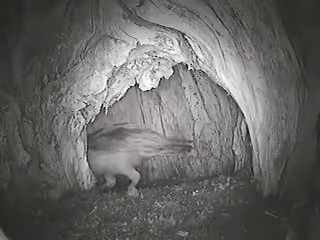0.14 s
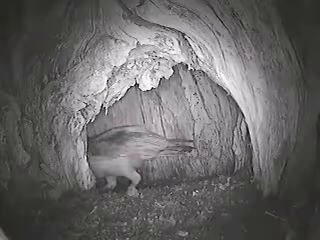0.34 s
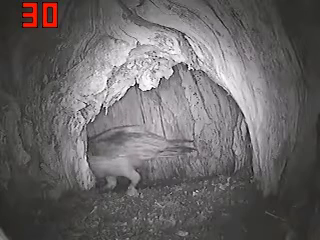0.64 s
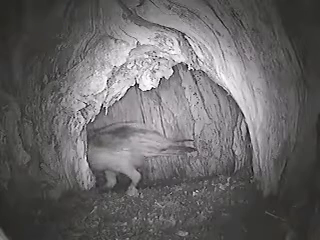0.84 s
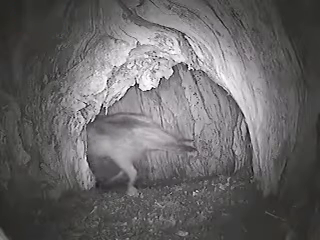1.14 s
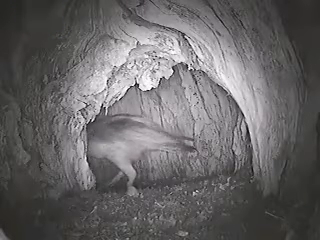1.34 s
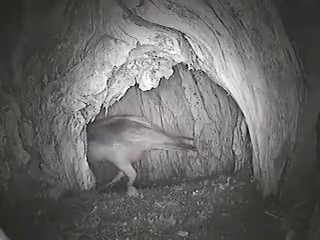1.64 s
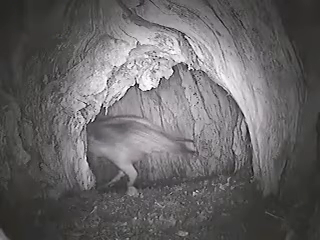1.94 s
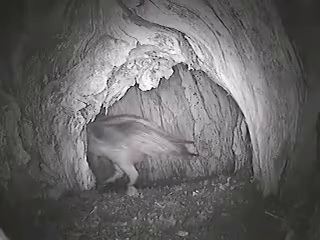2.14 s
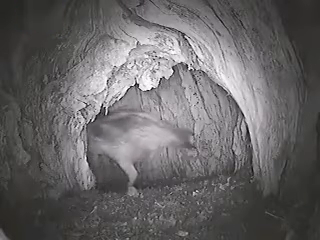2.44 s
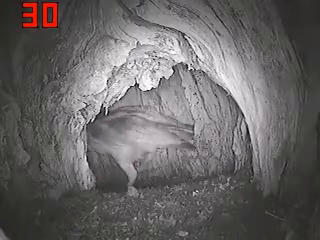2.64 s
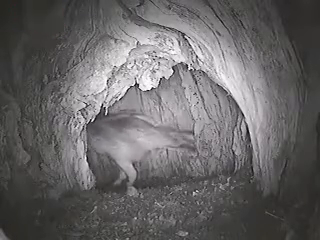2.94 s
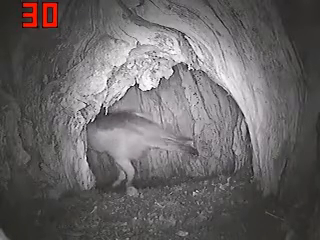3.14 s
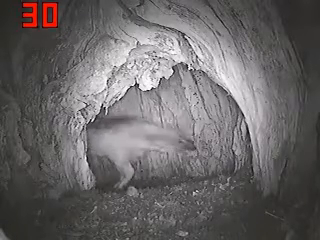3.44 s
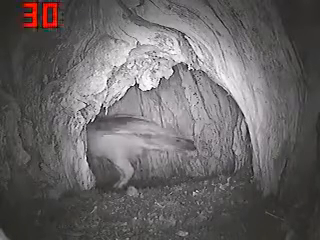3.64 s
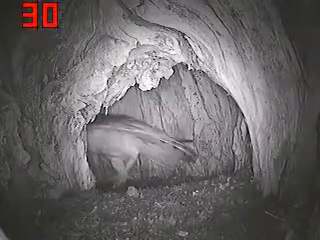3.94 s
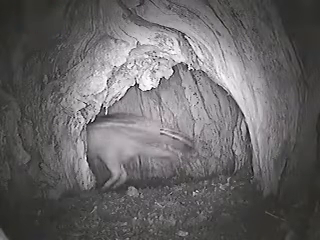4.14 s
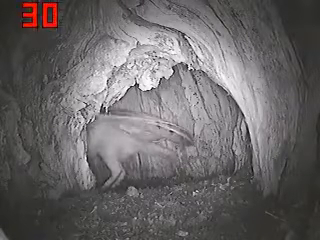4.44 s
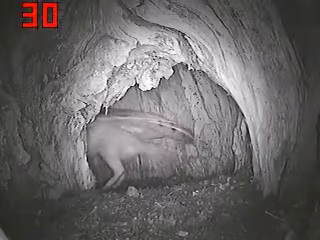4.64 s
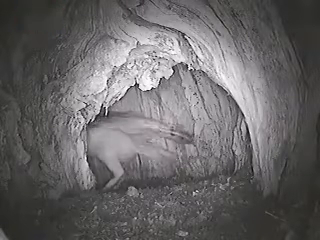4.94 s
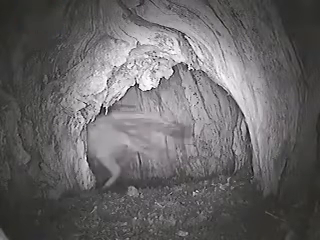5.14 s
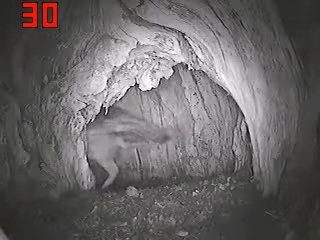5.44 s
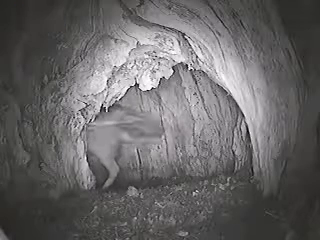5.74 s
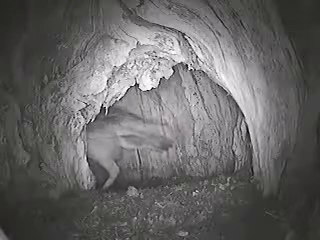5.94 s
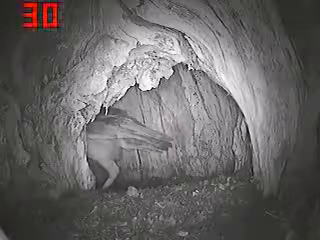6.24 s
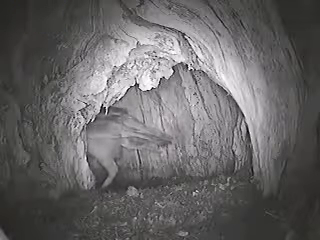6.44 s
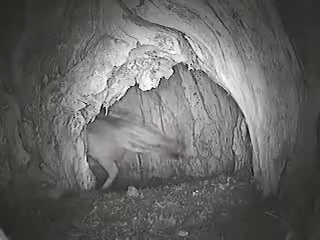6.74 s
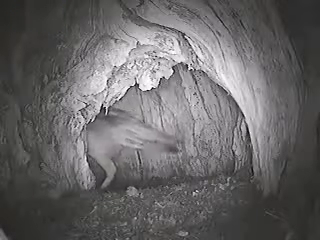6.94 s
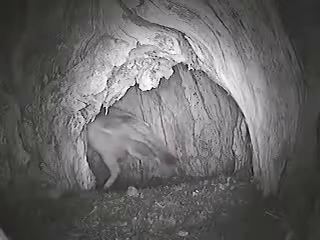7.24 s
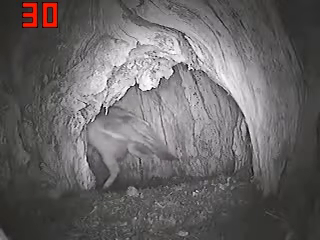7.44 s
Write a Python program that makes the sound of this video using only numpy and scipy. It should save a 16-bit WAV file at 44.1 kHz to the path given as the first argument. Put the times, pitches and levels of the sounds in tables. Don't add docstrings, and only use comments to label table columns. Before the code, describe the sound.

Two young barn owls beg for food in a hollow tree at night. The nearer one gives loud, harsh, half-second hisses that tighten as they swell and stop crisply. A second, fainter owl further back hisses at a steady pace of about once a second, at first overlapping, then drifting into the gaps. Wood adds a short bright ring. Faint air hiss and hum lie beneath, through a cheap, compressed nest microphone.

```python
import sys
import numpy as np
from scipy import signal
from scipy.fft import rfft, irfft
from scipy.io import wavfile
from scipy.ndimage import uniform_filter1d

SR = 44100
rng = np.random.default_rng(int(sys.argv[2]) if len(sys.argv) > 2 else 0)


def volts(x):
    e = np.asarray(x, float) / 20
    return 10 ** e


def log_audio(samples):
    frames = np.atleast_2d(samples).T
    limited = np.clip(frames, -1, 1)
    pcm = np.round(limited * 32767).astype(np.int16)
    wavfile.write(sys.argv[1], SR, pcm)


N = 334278


def evened(x):
    return x / np.sqrt(np.mean(x ** 2) + 1e-20)


def coloured(points, size):
    point_hz, point_db = np.transpose(points)
    hz = np.fft.rfftfreq(size, 1 / SR)
    gain_db = np.interp(np.log(hz + 1), np.log(point_hz), point_db)
    return irfft(rfft(rng.standard_normal(size)) * volts(gain_db), size)


def resonate(x, hz, width):
    turn = np.exp(2j * np.pi * np.cumsum(hz) / SR)
    r = np.exp(-np.pi * width / SR)
    once = signal.lfilter([1 - r], [1, -r], x / turn)
    twice = signal.lfilter([1 - r], [1, -r], once)
    return 2 * (turn * twice).real


# frequency in Hz, level in dB.
AIR_COLOUR = [(15, -37), (30, -3.5), (63, -3), (170, -5), (450, -3), (700, -1), (1230, -5), (2330, -4.5),
              (3200, -11.5), (4600, -13.5), (5300, -20), (6200, -16), (7300, -19), (9000, -34.5)]
# frequency in Hz, width in Hz, level in dB.
NIGHT_DRONES = [(59.45, 13, -68.5), (729, 200, -63), (5220, 150, -81)]


def night():
    sound = volts(-51.5) * evened(coloured(AIR_COLOUR, N))
    for hz, width, db in NIGHT_DRONES:
        band = resonate(rng.standard_normal(N), np.full(N, float(hz)), width)
        sound = sound + volts(db) * evened(band)
    return sound


def hollow(x):
    echo_db, t60_s = -15.5, .34
    t = np.arange(SR // 2) / SR
    wood = coloured([(1000, -20), (2700, -1.5), (4500, -0.94), (7400, -3)], len(t))
    tail = wood * volts(-60 * t / t60_s)
    return volts(echo_db) * signal.fftconvolve(x, tail / np.linalg.norm(tail))[:N]


def owl(calls, pipe, rush, full_db, slack, rasp_db, swell_db, swell_s, stretch_s, crisp):
    attack_db_per_s, release_db_per_s = 563, 438
    effort_db, low_db = np.full(N, -90.), np.zeros(N)
    loose, rush_db = np.ones(N), np.zeros(N)
    reached_db = np.full(N, float(full_db))
    t = np.arange(N) / SR
    for start, length, top_db, factor, beak_db in calls:
        on = (t >= start - .12) & (t <= start + length + .3)
        u = t[on] - start
        since = np.maximum(u, 0)
        rising_db = top_db - swell_db * np.exp(-since / swell_s) + attack_db_per_s * np.minimum(u, 0)
        effort_db[on] = rising_db - release_db_per_s * crisp * np.maximum(u - length, 0)
        reached_db[on] = top_db - swell_db * np.exp(-since / stretch_s)
        low_db[on] = -3.5 * np.exp(-abs(u) / 0.12) - 2 * np.exp(-abs(u - length) / 0.045)
        loose[on], rush_db[on] = factor, beak_db
    effort = uniform_filter1d(volts(effort_db), 500)
    sag = slack * loose * np.clip(full_db - uniform_filter1d(reached_db, 2500), 0, 10)

    air = rng.standard_normal(N)
    voice = np.zeros(N)
    for k, (hz, width, db, share) in enumerate(pipe):
        mode = volts(db) * resonate(air, hz * (1 - share * sag), width)
        if k == 0:
            mode = mode * volts(low_db)
        voice = voice + (-1) ** k * mode
    voice = voice * volts(-50 * sag) + volts(rush_db) * coloured(rush, N)
    rasp = evened(uniform_filter1d(rng.standard_normal(N), 300))
    return effort * evened(voice * volts(rasp_db * rasp))


# start in seconds, length in seconds, top effort in dB,
# sag factor (no unit), beak rush in dB.
FAR_HISSES = [
    (-.2, 0.49, -35, .9, 0.0052),
    (.82, .49, -37.5, .9, 0.0082),
    (1.85, .48, -38, 1, 0.),
    (2.905, .52, -37, .9, 0.),
    (4.095, .52, -37.5, 1, 0.0021),
    (5.215, 0.5, -35.5, .9, 0.0042),
    (6.27, 0.51, -36.5, 0.64, 0.),
    (7.33, 0.39, -35, 0.83, 0.),
]
# frequency in Hz, width in Hz, level in dB,
# share of the sag (no unit).
FAR_MODES = [(3070, 850, -16.5, 0.091), (4452, 400, -2.5, 1), (4854, 520, -8.5, 0.67), (5580, 690, -5.5, 1),
             (7330, 370, -14, 0.031)]
# frequency in Hz, level in dB.
FAR_BEAK = [(1000, -46.5), (2600, -28.5), (3800, -17.5), (4300, -7.5), (6000, -15), (7400, -15),
            (9000, -20.5)]


def far_owl():
    return owl(FAR_HISSES, FAR_MODES, FAR_BEAK, full_db=-36.5, slack=0.0031, rasp_db=0.57,
               swell_db=8.5, swell_s=.22, stretch_s=0.076, crisp=.55)


# start in seconds, length in seconds, top effort in dB,
# sag factor (no unit), beak rush in dB.
NEAR_HISSES = [
    (-.25, 0.46, -24.5, 0.56, 2.5),
    (.776, 0.46, -24, 0.72, 1.6),
    (1.852, .44, -24, .9, 0.),
    (3.195, .47, -23.5, .95, 0.66),
    (4.355, .48, -23, 0.89, -4),
    (6.112, 0.44, -24.5, 0.93, -1),
    (7.332, 0.49, -24.5, 0.97, 0.6),
]
# frequency in Hz, width in Hz, level in dB,
# share of the sag (no unit).
NEAR_MODES = [(2738, 230, -4, .9), (4283, 340, 0.87, 1.05), (4800, 500, -6.5, 0.86), (5367, 630, -4.5, 0.4),
              (6787, 550, -13, 0.17)]
# frequency in Hz, level in dB.
NEAR_BEAK = [(50, -38.5), (800, -31.5), (2100, -29), (2600, -18), (3500, -13.5), (5000, -11.5), (6200, -15),
             (7400, -21.5), (9000, -20)]


def near_owl():
    return owl(NEAR_HISSES, NEAR_MODES, NEAR_BEAK, full_db=-23.5, slack=0.014, rasp_db=-0.25,
               swell_db=10.5, swell_s=.12, stretch_s=.125, crisp=1.1)


def scene():
    near = near_owl()
    far = far_owl()
    ring = hollow(near + volts(5.5) * far)
    return np.tile(near + far + ring + night(), (2, 1))


LINK_SR, HOP, FIRST, LAST_BIN = 16000, 512, 267, 466
# start in seconds, hold in seconds, thrift in dB,
# recovery in seconds.
STARVED_MOMENTS = [(2.19, .006, 16, .025), (3.63, .04, 18, .11), (3.76, .3, 5.5, .03), (4.11, .04, 7, .03),
                   (4.175, .135, 9, .03), (4.335, .006, 11, .03), (4.365, .49, 16.5, .085),
                   (5.39, .04, 11, .03), (5.518, .04, 11.5, .03), (5.71, .006, 11.5, .11),
                   (6.702, .006, 13, .035)]


def thrift(t):
    out = 4.0 + .9 * rng.standard_normal(len(t))
    for start, hold, db, recover in STARVED_MOMENTS:
        corners = [start - HOP / LINK_SR, start, start + hold, start + hold + recover]
        out = np.maximum(out, np.interp(t, corners, [0, db, db, 2], 0, 0))
    return out


def stream(x, follow, tilt_db, dead, fill_db, edge_db, flatten, flicker_db, margin_db, starve_db):
    n, k = np.arange(2 * HOP), np.arange(HOP)
    window = np.sin(np.pi * (n[:, None] + .5) / (2 * HOP))
    basis = np.cos(np.pi / HOP * np.outer(n + .5 + HOP / 2, k + .5)) * window * np.sqrt(2 / HOP)
    slow = signal.resample_poly(x, LINK_SR // 100, SR // 100)
    z = np.pad(slow, (2 * HOP - FIRST, 2 * HOP))
    frames = z[:len(z) // HOP * HOP].reshape(-1, HOP)
    lines = np.hstack([frames[:-1], frames[1:]]) @ basis
    t = (np.arange(len(lines)) * HOP - HOP + FIRST) / LINK_SR

    low = slice(0, HOP // 4)
    shape_db = 10 * np.log10(uniform_filter1d(lines ** 2, size=40, axis=1) + 1e-12)
    shape_db = uniform_filter1d(shape_db, size=30, axis=1)
    shape_db -= shape_db[:, low].mean(axis=1, keepdims=True)
    low_db = 10 * np.log10(np.mean(lines[:, low] ** 2, axis=1, keepdims=True) + 1e-12)

    thrift_db = thrift(t)[:, None]
    hunger = np.clip((thrift_db - 5.0) / 12, 0, 1)
    coarse_db = low_db + thrift_db + margin_db + starve_db * hunger
    step = volts(coarse_db + (follow - flatten * hunger) * shape_db + tilt_db * k / HOP)
    level = np.floor(abs(lines) / step + 1 - dead) * np.sign(lines) * (k < LAST_BIN)

    top_db = edge_db * (1.3 - hunger) * (k >= LAST_BIN) * (k - LAST_BIN + 30) / 50
    fill = volts(fill_db - starve_db * hunger + top_db) * rng.standard_normal(lines.shape)
    flicker = evened(uniform_filter1d(rng.standard_normal((len(lines), 2 * HOP)), 90, axis=1))
    back = (level * step) @ basis.T + (fill * step) @ basis.T * volts(flicker_db * hunger * flicker)
    out = np.zeros_like(frames)
    out[:-1] += back[:, :HOP]
    out[1:] += back[:, HOP:]
    return signal.resample_poly(out.ravel()[2 * HOP - FIRST:], SR // 100, LINK_SR // 100)[:N]


def band_limit(x):
    return signal.sosfilt(signal.butter(12, 8010, fs=SR, output="sos"), x)


def record(dry):
    x = dry[0]
    rounded = 0.31 * np.tanh(x / 0.31)
    lopsided = .12 * (x ** 2 - uniform_filter1d(x ** 2, size=4000))
    streamed = stream(rounded + lopsided, follow=.48, tilt_db=-5.5, dead=.55, fill_db=-27.0, edge_db=-2.5,
                      flatten=0.16, flicker_db=3.0, margin_db=5.5, starve_db=2.5)
    return band_limit(np.tile(streamed, (2, 1)))


dry = scene()
out = record(dry)
log_audio(out)
```